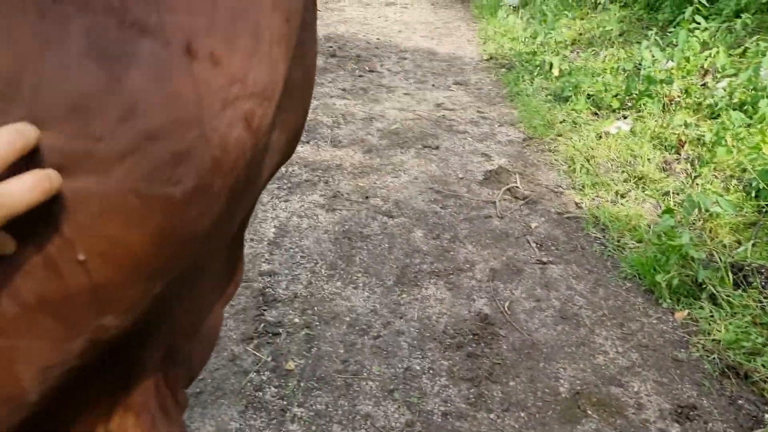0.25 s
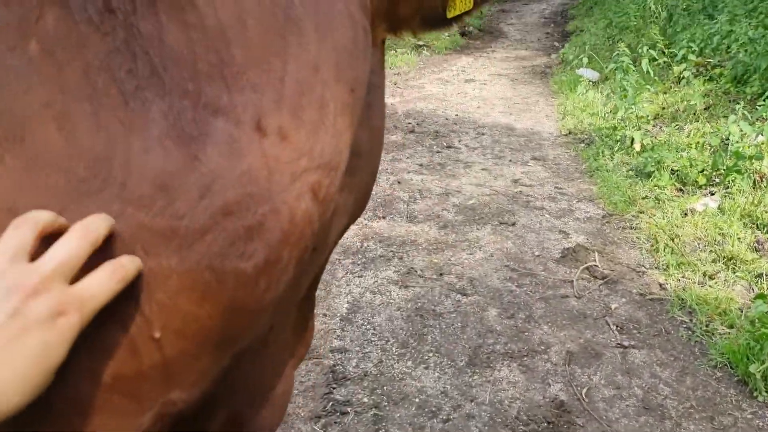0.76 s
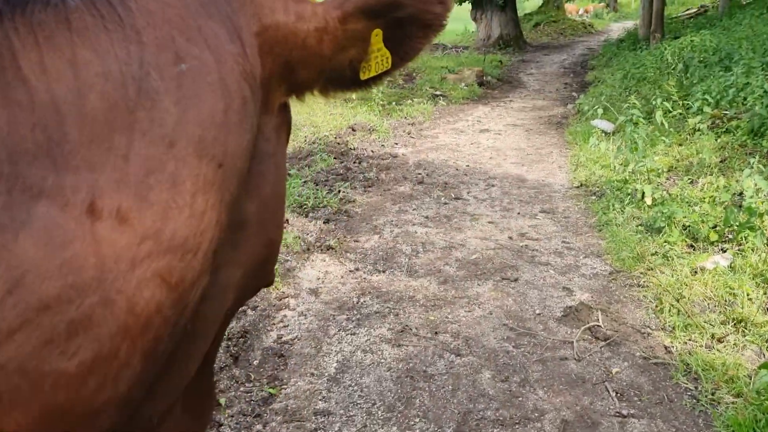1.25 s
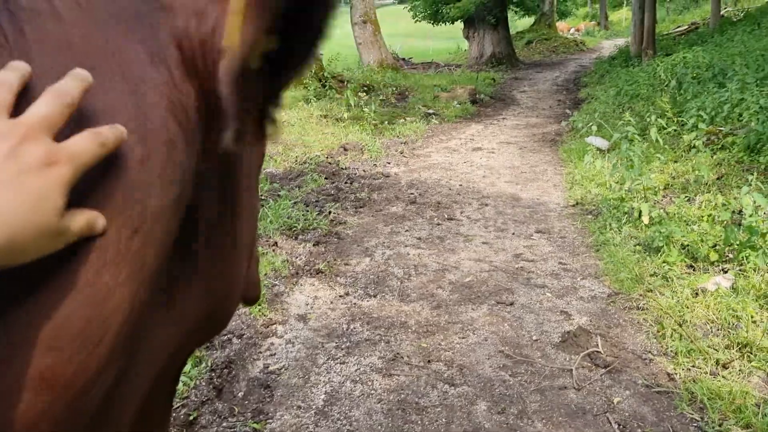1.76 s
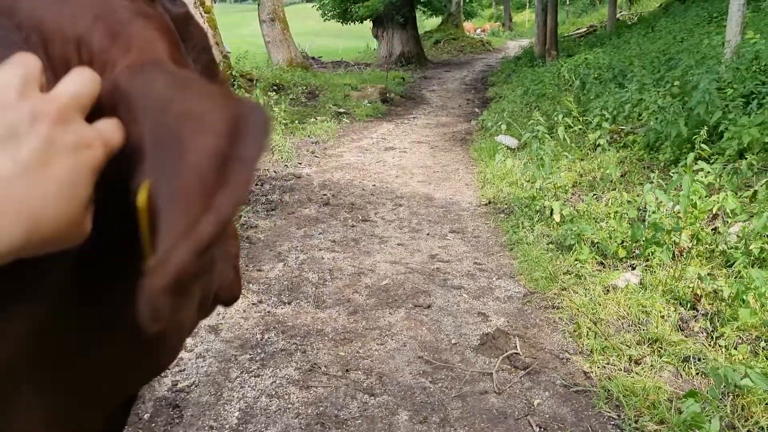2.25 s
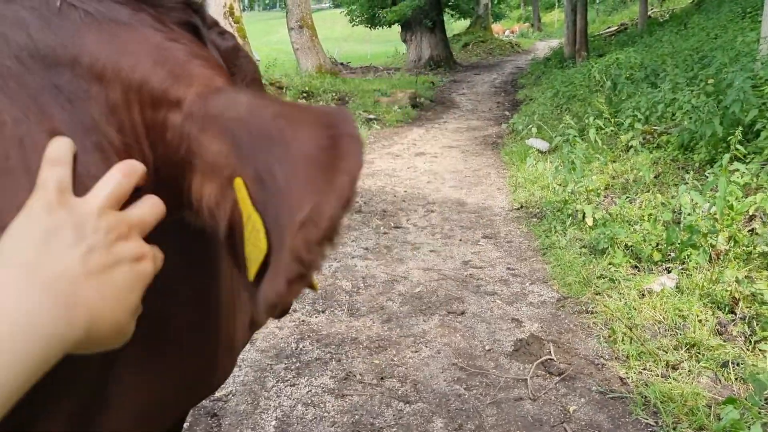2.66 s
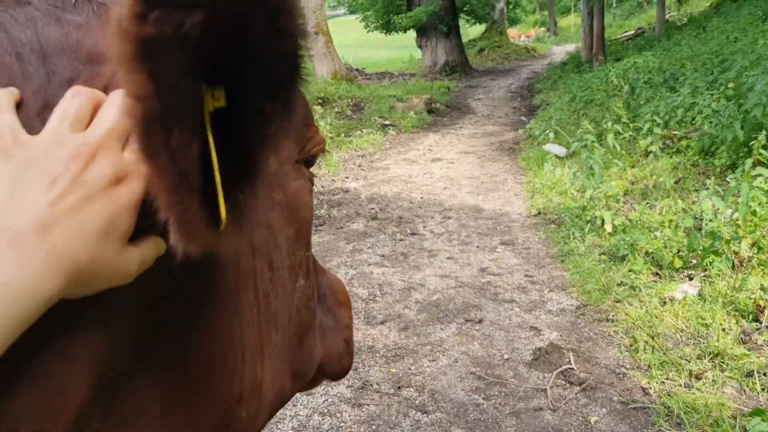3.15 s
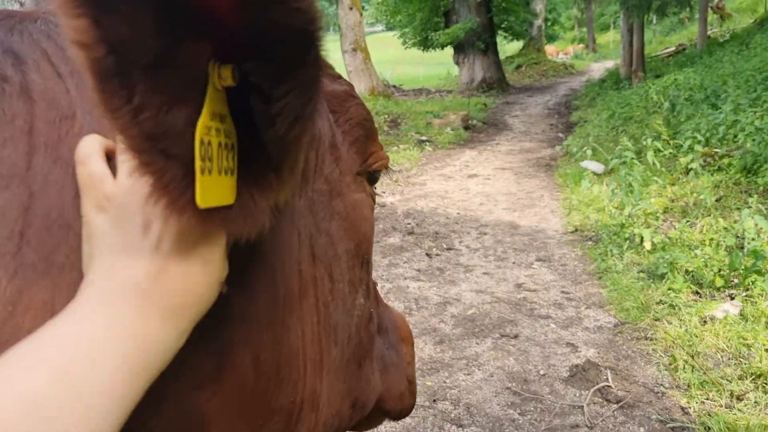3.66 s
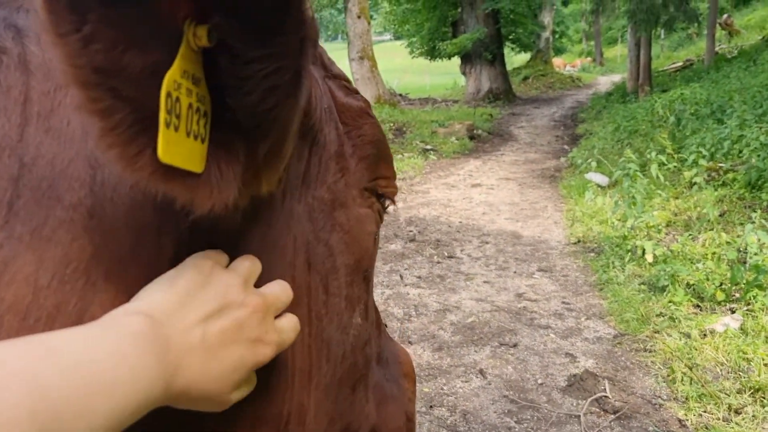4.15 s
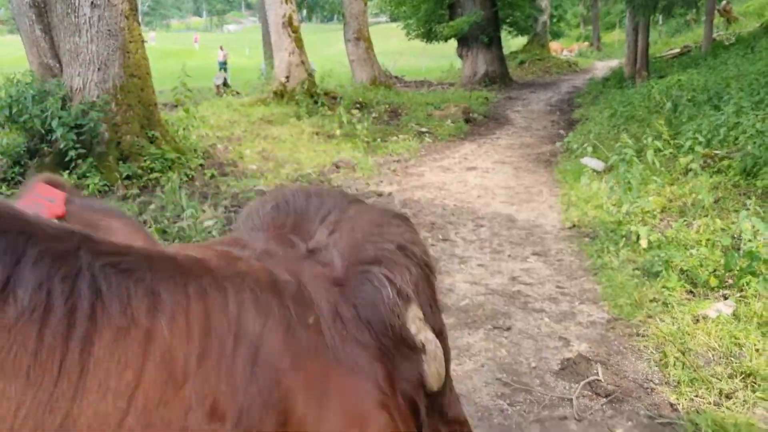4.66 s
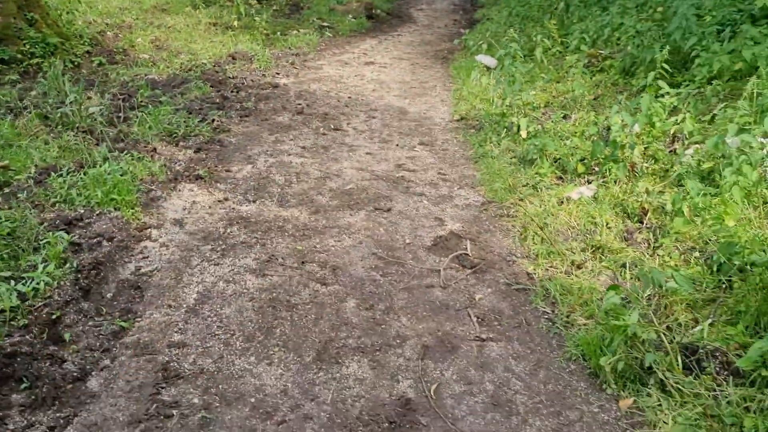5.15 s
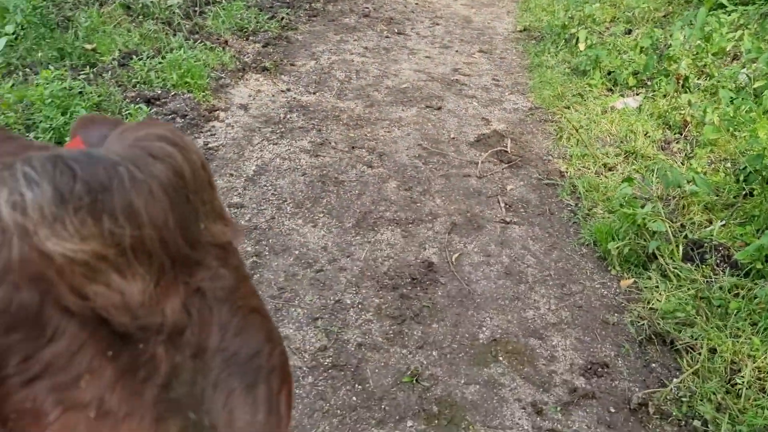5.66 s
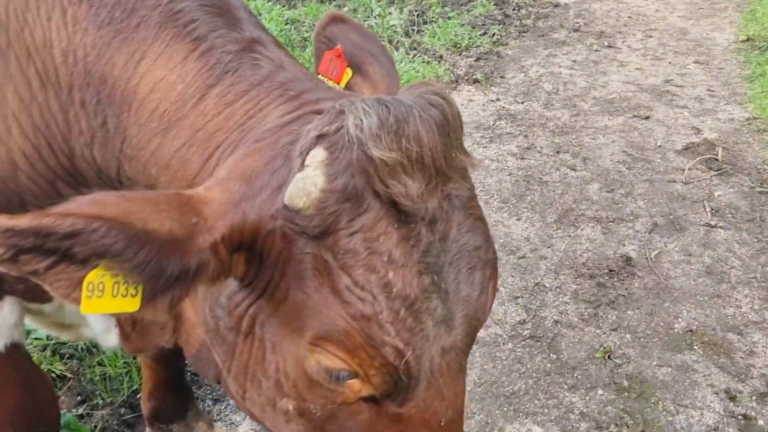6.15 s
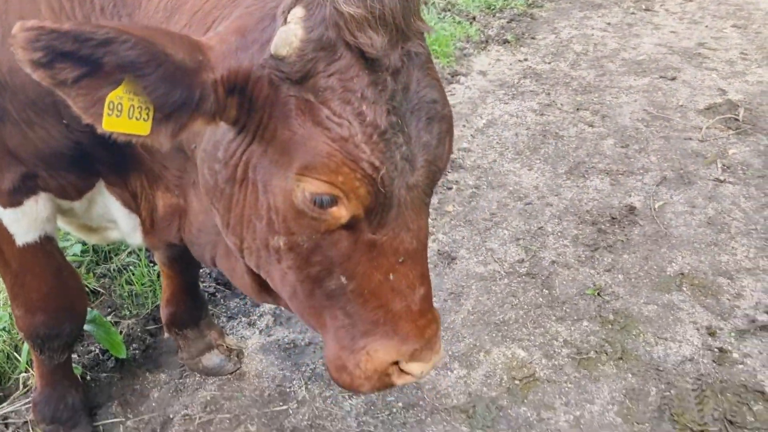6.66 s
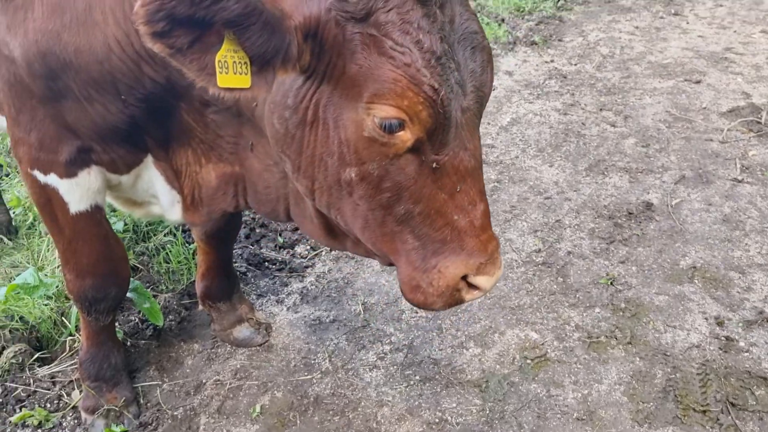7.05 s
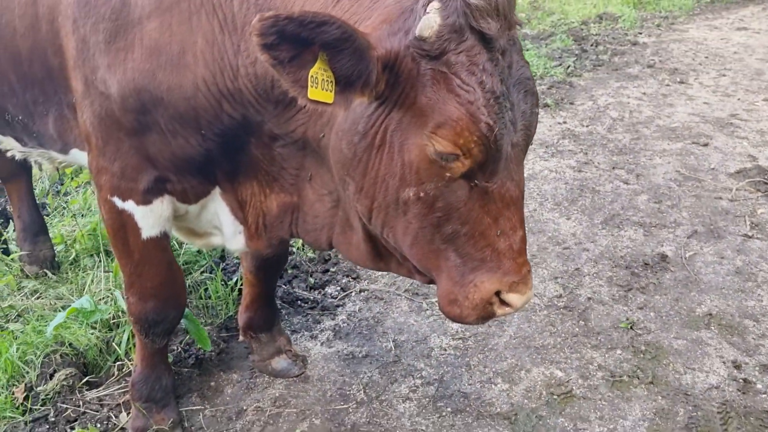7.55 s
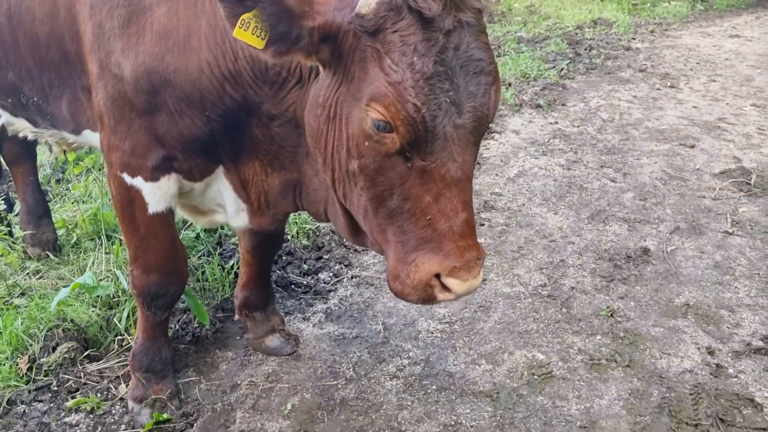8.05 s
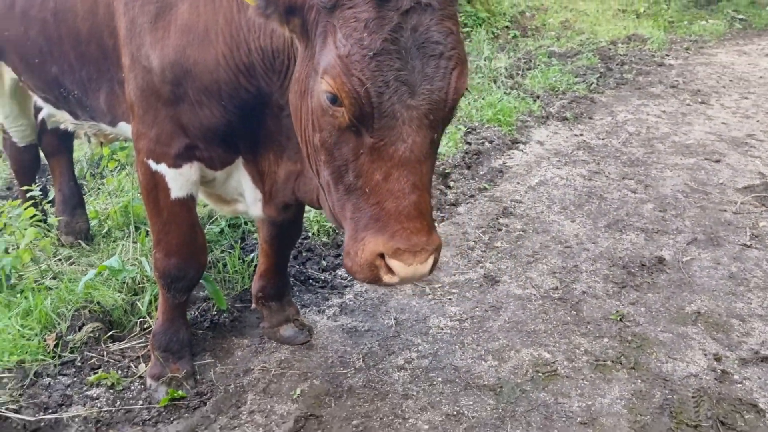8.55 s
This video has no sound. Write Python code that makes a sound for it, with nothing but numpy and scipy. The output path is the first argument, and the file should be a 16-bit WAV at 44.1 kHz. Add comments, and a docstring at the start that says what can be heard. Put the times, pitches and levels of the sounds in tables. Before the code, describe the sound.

A cow gives one long, rising, closed-mouth moo up close, then shakes her head with flapping ears and a sharp snap.

```python
"""Leaves rustle on a forest path, an engine drones far off, a tit sings two notes and small birds call.
A stroked cow moos once, mouth shut: her vocal folds drive a low nasal hum that climbs, breaks into a
high register and sinks. She then shakes her head: the ears flap, hair brushes past and the plastic
ear tag snaps close to the microphone."""
import sys
import numpy as np
from scipy import signal
from scipy.fft import rfft, irfft, next_fast_len
from scipy.io import wavfile
from scipy.ndimage import uniform_filter1d, map_coordinates

SR = 44100
rng = np.random.default_rng(int(sys.argv[2]) if len(sys.argv) > 2 else 0)


def materialize(psi):
    """Save the field psi as 16-bit PCM at rate SR to the path in sys.argv[1].

    A 1-D psi becomes a single channel; in a 2-D psi each row is a channel.
    """
    bounded = np.clip(np.atleast_2d(psi).T, -1, 1)
    quanta = np.round(bounded * 32767).astype(np.int16)
    wavfile.write(sys.argv[1], SR, quanta)


N = 388080
T = np.arange(N) / SR
MOO_START_S, MOO_END_S, SHAKE_S = 1.006, 2.9175, 4.696
# hair spectrum: (frequency [Hz], level [dB])
HAIR_SPECTRUM = [(1500, -23), (3000, -6), (7000, -6), (11000, -17.5), (13000, -11), (16000, -17.5)]


def amp(db):
    """Decibels to gain."""
    return 10 ** (np.asarray(db) / 20)


def unit(x):
    """Scale to rms 1."""
    return x / np.sqrt(np.mean(x ** 2) + 1e-20)


def along(points, hz):
    """Read (frequency [Hz], value) points on a log axis."""
    knots_hz, values = np.transpose(points)
    return np.interp(np.log(np.abs(hz) + 1), np.log(knots_hz + 1), values)


def curves(*tables):
    """One per-sample curve for each column after time."""
    times_s, *columns = np.vstack(tables).T
    return [np.interp(T, times_s, column) for column in columns]


def ramp(start_s, length_s):
    """Linear rise from 0 to 1."""
    return np.clip((T - start_s) / length_s, 0, 1)


def wobble(rate_hz):
    """Smooth curve through random knots."""
    return map_coordinates(rng.standard_normal(int(N * rate_hz / SR) + 4), [T * rate_hz])


def resonance(hz, centre_hz, width_hz):
    """Complex gain of one resonance."""
    return 1j * hz * width_hz / (centre_hz ** 2 - hz ** 2 + 1j * hz * width_hz)


def filtered(x, response):
    """Apply a frequency response."""
    size = next_fast_len(x.shape[-1] + 8192)
    return irfft(rfft(x, size) * response(np.fft.rfftfreq(size, 1 / SR)), size)[..., :x.shape[-1]]


def causal(spectrum, size=1024):
    """Minimum-phase impulse response, energy 1."""
    cepstrum = irfft(np.log(amp(along(spectrum, np.fft.rfftfreq(size, 1 / SR)))))
    cepstrum[1:size // 2] *= 2
    cepstrum[size // 2 + 1:] = 0
    impulse = irfft(np.exp(rfft(cepstrum)))
    return impulse / np.linalg.norm(impulse)


def add(out, start_s, x):
    """Mix x into out."""
    part = out[..., round(start_s * SR):][..., :x.shape[-1]]
    part += x[..., :part.shape[-1]]


def placed(x, lead_ms, pan_db):
    """Stereo position; positive values make the left earlier and louder."""
    side = np.array([[.5], [-.5]])
    return amp(side * pan_db) * filtered(x, lambda hz: np.exp(2j * np.pi * hz * side * lead_ms / 1000))


def rush(spectrum, lead_ms, spread, patchy_db):
    """Stereo noise, rms 1, with patches of random gain: one direction plus a diffuse share."""
    bins = signal.stft(rng.standard_normal((3, N)), nperseg=512)[2]
    patches = uniform_filter1d(rng.standard_normal(bins.shape[1:]), size=6, axis=0)
    patches = uniform_filter1d(patches, size=16, axis=1)
    noise = signal.istft(bins * amp(patchy_db * unit(patches)), nperseg=512)[1][:, :N]
    stereo = placed(noise[0], lead_ms, 0) + spread * noise[1:]
    return unit(filtered(stereo, lambda hz: amp(along(spectrum, hz))))


def air():
    """Low outdoor murmur, drifting in level."""
    # murmur spectrum: (frequency [Hz], level [dB])
    spectrum = [(30, -22), (65, -5.5), (100, -6.5), (200, -14.5), (400, -12.5), (650, -20.5), (1000, -25.5),
                (2000, -56)]
    return amp(-54.5 + .5 * wobble(8)) * rush(spectrum, lead_ms=.25, spread=.55, patchy_db=1)


def leaves():
    """Close rustle; stays louder after the head shake."""
    # leaf spectrum: (frequency [Hz], level [dB])
    spectrum = [(500, -25.5), (900, 1.5), (1300, 7.5), (1600, 0.5), (2700, -2.5), (3700, 0), (5000, -13),
                (7000, -21.5), (11000, -27.5), (15500, -37.5)]
    level_db = -60.5 + 4.5 * ramp(SHAKE_S, 1) + .71 * wobble(14)
    return amp(level_db) * rush(spectrum, lead_ms=.412, spread=.97, patchy_db=2.5) * amp([[-1.2], [1.2]])


def coat(flicks_per_s=220):
    """Stroked hair hisses; the head shake swells the hiss and flicks single hairs."""
    settled = ramp(SHAKE_S, 1)
    stir = ramp(SHAKE_S - .21, .21) - settled
    level_db = -69 + 11 * stir - 3.5 * settled
    hiss = amp(level_db + 1.3 * wobble(17)) * rush(HAIR_SPECTRUM, lead_ms=.356, spread=1, patchy_db=1.5)
    hits = rng.random(N) < stir * flicks_per_s / SR
    flicks = hits * rng.standard_normal(N) * np.sqrt(SR / flicks_per_s)
    crackle = placed(signal.fftconvolve(flicks, causal(HAIR_SPECTRUM))[:N], lead_ms=.22, pan_db=2.5)
    return hiss * amp([[-1.2], [1.2]]) + amp(level_db - 2.5) * crackle


def engine():
    """Distant engine: only the two lowest orders carry, wavering on the way."""
    # engine run: (time [s], firing rate [Hz], first order [dB], second order [dB])
    run = [(0, 67.9, -57, -69), (2.4, 64.13, -49, -62.5), (3.3, 54.38, -50, -61.5),
           (5.4, 56.66, -47, -54.5), (6.6, 59.73, -50.5, -58.5), (8.8, 59.34, -47.5, -69)]
    firing_hz, first_db, second_db = curves(run)
    phase = 2 * np.pi * np.cumsum(firing_hz * (1 + .02005 * wobble(19))) / SR
    first = amp(first_db + 2.5 * wobble(14)) * np.sin(phase)
    second = amp(second_db + 1.2 * wobble(1)) * np.sin(2 * phase)
    return placed(first + second, lead_ms=.36, pan_db=1.3)


def tit(period_s=.267, settled_hz=3890, upper_hz=5816, fall_hz_per_s=298):
    """See-saw song: a low whistle, settling in pitch over the phrase, alternates with a faint high one."""
    # phrases: (start [s], end [s], level [dB], first pitch [Hz], first pair's offset [dB])
    phrases = [(-0.14, .8, -50, 3929, 0.5), (2.09, 4.6, -51, 4090, -3.5), (7.398, 8.8, -49.5, 4100, -9.5)]
    out, t = np.zeros(N), np.arange(SR // 4) / SR

    def whistle(hz, delay_s, length_s):
        arch = np.sin(np.pi * np.clip((t - delay_s) / length_s, 0, 1))
        return np.sin(2 * np.pi * np.cumsum(hz - fall_hz_per_s * t) / SR) * np.sqrt(np.abs(arch))

    for start_s, end_s, db, first_hz, offset_db in phrases:
        for k, time_s in enumerate(np.arange(start_s, end_s, period_s)):
            lower = whistle(settled_hz + (first_hz - settled_hz) * .5 ** k, delay_s=0, length_s=.14)
            upper = amp(-14.5 + 2 * rng.standard_normal()) * whistle(upper_hz, delay_s=.11, length_s=.1)
            pair = amp(db + offset_db * .5 ** k) * (lower + upper)
            add(out, max(time_s, 0), pair[max(round(-time_s * SR), 0):])
    scatter = np.exp(.6j * wobble(140)) * amp(3 * wobble(40))  # trees blur the tone
    return placed(np.real(signal.hilbert(out) * scatter), lead_ms=.079, pan_db=-8)


def woods(x, t60_s):
    """Scattered echoes from the trunks."""
    t = np.arange(SR // 2) / SR
    tail = rng.standard_normal((2, len(t))) * amp(-60 * t / t60_s)
    return signal.fftconvolve(x, tail / np.linalg.norm(tail[0]), axes=1)[:, :N]


def birds(seep_s=.17, seep_hz=7900, seep_db=-74.5, seep_fall_hz=247, chirp_fall_hz=1350):
    """Thin notes, falling or level, with a quick pitch flutter."""
    # thin high calls: (start [s])
    seeps = [.11, .65, 1.445, 2.7, 4.42, 5.38, 7.38]
    # steep downward chirps: (start [s], length [s], start pitch [Hz], level [dB])
    chirps = [(0.351, 0.0061, 7600, -58), (3.39, 0.21, 7200, -69.5)]
    # level calls deep in the wood: (start [s], length [s], pitch [Hz], level [dB])
    far_calls = [(3.876, 0.35, 2290, -67.5), (5.353, 0.75, 2677, -65.5), (7.717, 0.35, 2244, -60)]
    out, flutter_hz = np.zeros(N), 110 * wobble(400)
    notes = [(start_s, seep_s, seep_hz, seep_db, seep_fall_hz) for start_s in seeps]
    notes += [(*chirp, chirp_fall_hz) for chirp in chirps] + [(*call, 0) for call in far_calls]
    for start_s, length_s, start_hz, db, fall_hz in notes:
        progress = np.linspace(0, 1, int(length_s * SR))
        hz = start_hz - fall_hz * progress + flutter_hz[round(start_s * SR):][:len(progress)]
        tone = np.sqrt(2) * np.sin(2 * np.pi * np.cumsum(hz) / SR)
        add(out, start_s, amp(db) * np.sin(np.pi * progress) * tone)
    return placed(out, lead_ms=0, pan_db=-6)


def contact(spectrum, t60_s, tail_db, tail_t60_s):
    """Stereo crack: a push, a scrape and a short rattle, coloured by the object."""
    t = np.arange(SR // 8) / SR
    scrape = rng.standard_normal(len(t)) + .5 * rng.standard_normal((2, len(t)))
    burst = scrape * (amp(-60 * t / t60_s) + amp(tail_db - 60 * t / tail_t60_s))
    burst[:, 0] += 8  # push
    crack = signal.fftconvolve(burst, causal(spectrum)[None])
    return 2.6 * crack / np.linalg.norm(crack, axis=1, keepdims=True)


def ticks():
    """Small contacts of tag, hair and grit."""
    # contacts: (time [s], relative level [dB], tilt [dB/octave])
    hits = [(0.95, -41, -3), (1.447, -29, -1), (1.746, -40.5, 4.5), (3.032, -43, 5), (4.265, -38, 1),
            (4.557, -24, -0.5), (4.661, -37, 4), (4.943, -39.5, -13), (5.052, -40, -1.5),
            (6.377, -34.5, 2.5), (7.441, -41, -3.5), (7.466, -36.5, -0.5), (8.687, -33.5, -8)]
    # tick spectrum before tilt: (frequency [Hz], level [dB])
    spectrum = [(200, -5.5), (600, 6.5), (1400, -1.5), (2500, 7), (3800, -2.5), (7000, -18), (15000, -30.5)]
    out = np.zeros((2, N))
    for time_s, db, tilt_db in hits:
        tilted = [(hz, level_db + tilt_db * np.log2(hz)) for hz, level_db in spectrum]
        add(out, time_s, amp(db + 4.5) * contact(tilted, t60_s=.012, tail_db=-10, tail_t60_s=.04))
    return out


def moo_controls(strain_hz=239.8, strain_span_hz=39, lift_s=.04, release_s=.087):
    """Pitch, strain and gains of hum, throat and buzz; each gain swells, holds and dies away."""
    # low-register climb: (time [s], pitch [Hz])
    low_register = [(1.1, 73.17), (1.349, 90.86), (1.6, 121.7), (1.69, 132.2), (1.812, 137.4)]
    # high-register arch and collapse: (time [s], pitch [Hz])
    high_register = [(1.838, 226.8), (2.14, 240.2), (2.237, 265.2), (2.384, 280.2), (2.55, 265.9),
                     (2.659, 253.2), (2.773, 226.3), (2.86, 145), (2.89, 80), (2.94, 52)]
    # flares of the nasal buzz: (middle [s], length [s], gain [dB])
    flares = [(1.28, .2, 6), (2.07, .13, 5.5), (2.37, .08, 5), (2.744, .17, 3.5)]
    pitch_hz, = curves(low_register, high_register)
    lift = ramp(high_register[0][0] - lift_s, lift_s)  # swell into the high register
    strain = np.clip((pitch_hz - strain_hz) / strain_span_hz, 0, 1)
    release = (1 - ramp(MOO_END_S - release_s, release_s)) ** 2
    swell = lambda attack_s: ramp(MOO_START_S, attack_s) ** 1.65 * release
    flare_db = sum(db * np.exp(-(2 * (T - mid_s) / length_s) ** 4) for mid_s, length_s, db in flares)
    hum_gain = swell(attack_s=.56) * amp(-29.5 + 4.5 * lift - 5.5 * strain)
    throat_gain = swell(attack_s=.23) * amp(-49.5 + 3.5 * lift - 2 * strain)
    buzz_gain = swell(attack_s=.23) * amp(-57.5 + flare_db)
    return pitch_hz, strain, hum_gain, throat_gain, buzz_gain


def harmonics(pitch_hz, phase, response, count):
    """Pulses of rms 1 whose harmonics slide through a resonant shape."""
    wave, power = 0, 1e-12
    for k in range(1, count + 1):
        gain = response(k * pitch_hz)
        wave = wave + np.real(gain * np.exp(1j * k * phase))
        power = power + np.abs(gain) ** 2 / 2
    return wave / np.sqrt(power)


def throat(hz):
    """Throat response: resonances with dark valleys and steep skirts."""
    # resonances: (centre [Hz], width [Hz], level [dB])
    formants = [(445, 44, 3), (507, 42, 3.5), (696, 23, -0.5), (806, 43, -18), (1059, 58, -6.5),
                (1212, 18, -5)]
    peaks = sum(amp(db) * resonance(hz, centre_hz, width_hz) for centre_hz, width_hz, db in formants)
    return peaks / (1 + (hz / 1480) ** 20) / (1 + (400 / (hz + 1)) ** 10)


def moo(subtone_db=-12.5):
    """Vocal folds drive a clean nasal hum, throat overtones and a rougher buzz."""
    # hum of the closed muzzle: (frequency [Hz], level [dB])
    hum_spectrum = [(70, -2), (130, 5.5), (205, 4.5), (255, 3), (305, -8), (390, -22.5), (480, -75)]
    # buzz in the nose: (frequency [Hz], level [dB])
    buzz_spectrum = [(1500, -36), (1900, 5.5), (2200, -22.5), (2550, 11), (2800, -4), (3200, 4),
                     (4600, -32.5), (8300, -20), (9600, -21), (10800, -46)]
    pitch_hz, strain, hum_gain, throat_gain, buzz_gain = moo_controls()
    pitch_hz = pitch_hz * (1 + (.003 + .005 * strain) * wobble(110) + .004 * wobble(22))
    phase = 2 * np.pi * np.cumsum(pitch_hz) / SR
    on = (T > MOO_START_S) & (T < MOO_END_S)
    voiced = lambda response, count: harmonics(pitch_hz[on], phase[on], response, count)
    muzzle = lambda hz: amp(along(hum_spectrum, hz)) * np.exp(1j * np.angle(resonance(hz, 190, 70)))
    strained_throat = lambda hz: throat(hz) + strain[on] * resonance(hz, 1085, 110) ** 2
    nose = lambda hz: amp(along(buzz_spectrum, hz))
    nostrils = lambda hz: resonance(hz, 3100, 300) ** 2 + resonance(hz, 3780, 250) ** 2
    hum, overtones, buzz = np.zeros((3, N))
    hum[on] = voiced(muzzle, count=6)
    # the long throat and the nose spread each pulse in time
    overtones[on] = voiced(lambda hz: strained_throat(hz) * np.exp(-1j * (hz / 380) ** 2), count=22)
    buzz[on] = voiced(lambda hz: nose(hz) * np.exp(1j * np.sqrt(hz)), count=56)
    overtones *= 1 + 2 * amp(subtone_db) * strain * np.cos(phase / 2)  # strained cycles alternate
    puffs = rng.standard_normal(N) * (1 + np.cos(phase))  # air escapes once a cycle
    overtones += .15 * unit(filtered(puffs, throat))
    buzz += .45 * unit(filtered(puffs, nose))
    onset_rasp = amp(-51) * np.exp(-((T - 1.27) / .13) ** 2) * unit(filtered(puffs, nostrils))
    hum *= hum_gain * amp((.62 + .36 * strain) * wobble(70))
    overtones *= throat_gain * amp(1.76 * wobble(45))
    buzz *= buzz_gain * amp(2 * wobble(35.74))
    return placed((hum + overtones + buzz + onset_rasp) * on, lead_ms=.09, pan_db=.9)


def brushes():
    """Hair sweeps by in short grainy strokes."""
    # strokes: (middle [s], length [s], level [dB], band centre [Hz])
    strokes = [(4.303, 0.1, -56.5, 2800), (4.797, .27, -60.5, 2600), (5.078, 0.016, -42, 3120),
               (5.204, .022, -44.5, 3900), (5.264, .025, -44, 2180)]
    out = np.zeros(N)
    for mid_s, length_s, db, centre_hz in strokes:
        t = np.arange(int(3 * length_s * SR)) / SR
        half_s = t[-1] / 2
        grains = rng.standard_normal(len(t)) * rng.exponential(size=len(t))
        hiss = unit(filtered(grains, lambda hz: resonance(hz, centre_hz, width_hz=1400)))
        add(out, mid_s - half_s, amp(db) * hiss * np.exp(-(2 * (t - half_s) / length_s) ** 2))
    return placed(out, lead_ms=.42, pan_db=-3)


def thud(hz, t60_s):
    """Soft, heavily damped blow."""
    t = np.arange(SR // 8) / SR
    return np.sin(2 * np.pi * hz * t) * amp(-60 * t / t60_s)


def ears():
    """Flapping ears land as soft thuds."""
    # flaps: (time [s], level [dB])
    flaps = [(4.55, -31.5), (4.585, -33), (4.623, -35), (6.873, -37.5)]
    out = np.zeros(N)
    for time_s, db in flaps:
        add(out, time_s, amp(db) * thud(hz=199, t60_s=.068))
    return out


def ear_tag():
    """The plastic tag snaps: quick contacts, each a crack and a low knock."""
    # contacts: (time [s], crack level [dB], knock level [dB])
    hits = [(5.0996, -14, -52), (5.104, 1.5, -33), (5.1109, -21, -27.5), (5.1141, -17.5, -26.5)]
    # tag spectrum: (frequency [Hz], level [dB])
    spectrum = [(100, -2.5), (330, -1.5), (750, -14.5), (1300, 9.5), (1750, -8), (3200, -4.5), (4400, -5),
                (7500, -16.5), (8800, -16.5), (10000, -20.5), (16000, -29)]
    cracks, knocks = np.zeros((2, 2, N))
    for time_s, crack_db, knock_db in hits:
        add(cracks, time_s, amp(crack_db) * contact(spectrum, t60_s=.011, tail_db=-15, tail_t60_s=.07))
        add(knocks, time_s, amp(knock_db) * thud(hz=344, t60_s=.015))
    return knocks + placed(cracks, lead_ms=.3, pan_db=-3)


def scene():
    """Near sounds are almost dry; birdsong carries the echo of the wood."""
    near = moo() + ticks() + ears() + ear_tag() + brushes()
    far = tit() + birds()
    echo = woods(amp(-31) * near + amp(-3) * far, t60_s=.8)
    return near + far + echo + engine() + air() + leaves() + coat()


def record(dry, ceiling=.88, top_hz=15850):
    """The camera rounds off the loudest peak and cuts everything above its band limit."""
    rounded = dry / (1 + (dry / ceiling) ** 4) ** .25
    return filtered(rounded, lambda hz: hz < top_hz)


dry = scene()
out = record(dry)
materialize(out)
```